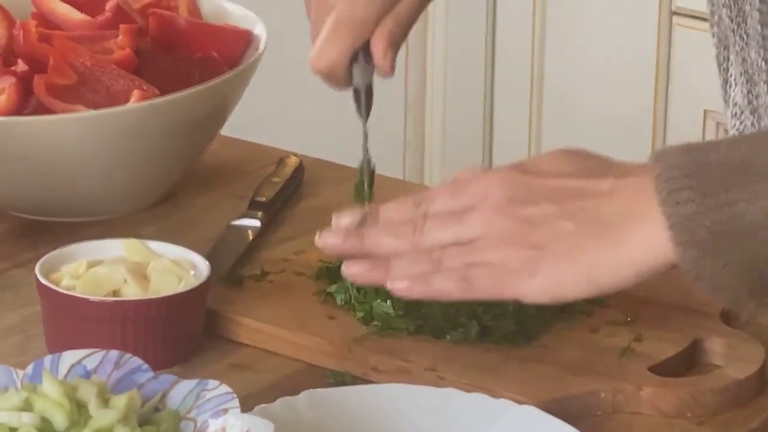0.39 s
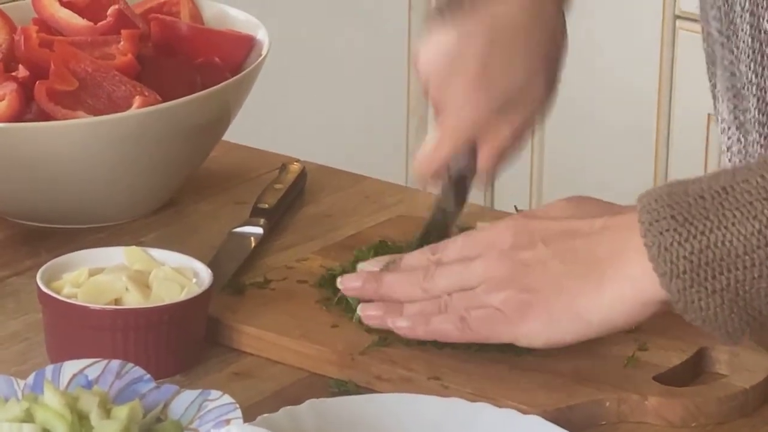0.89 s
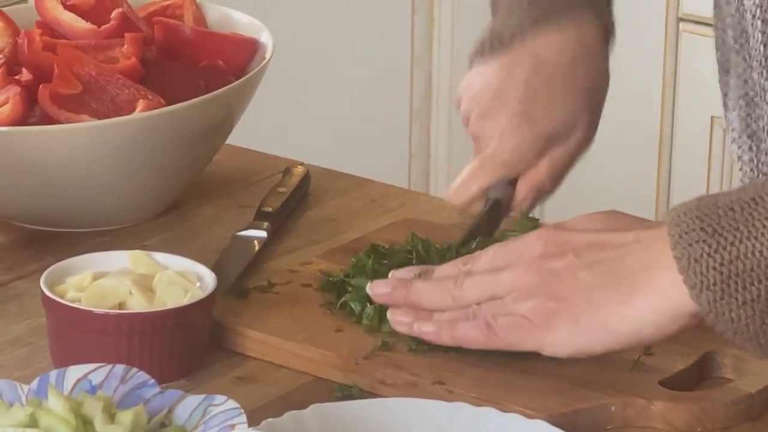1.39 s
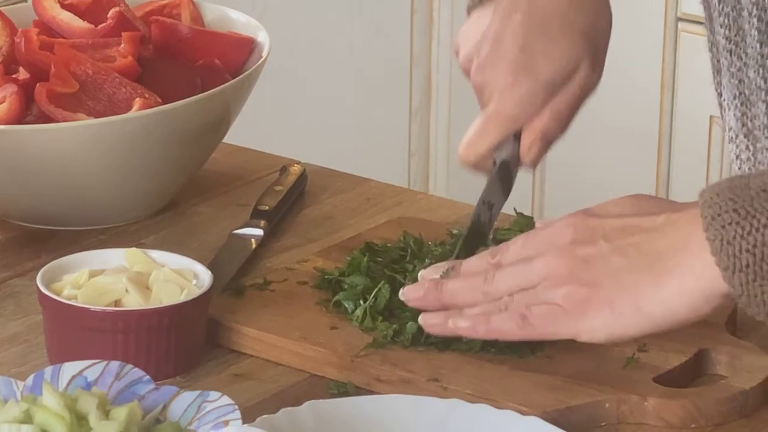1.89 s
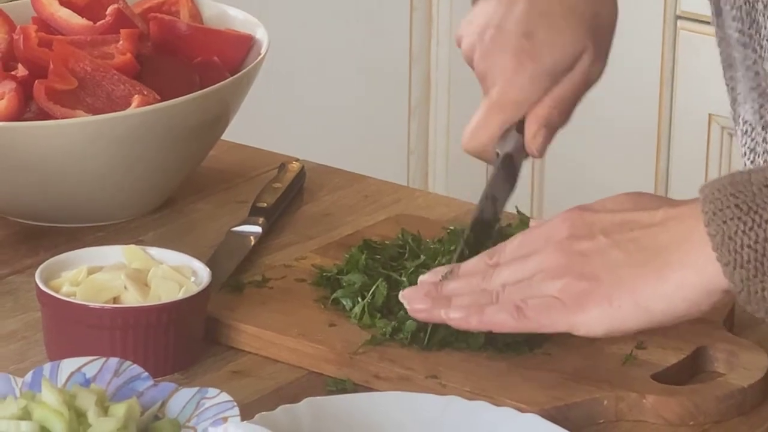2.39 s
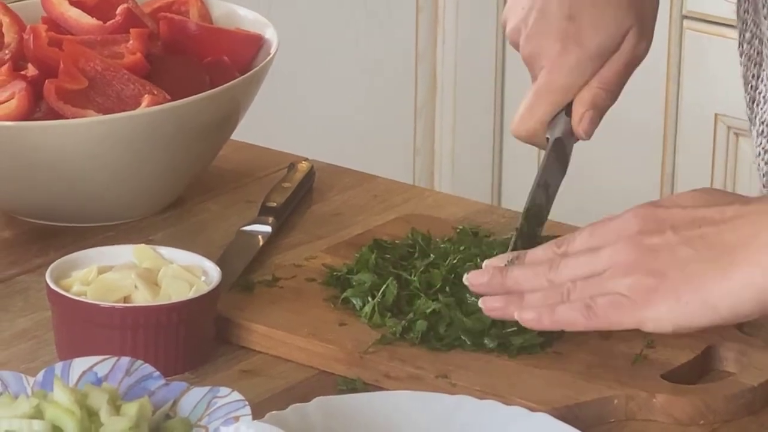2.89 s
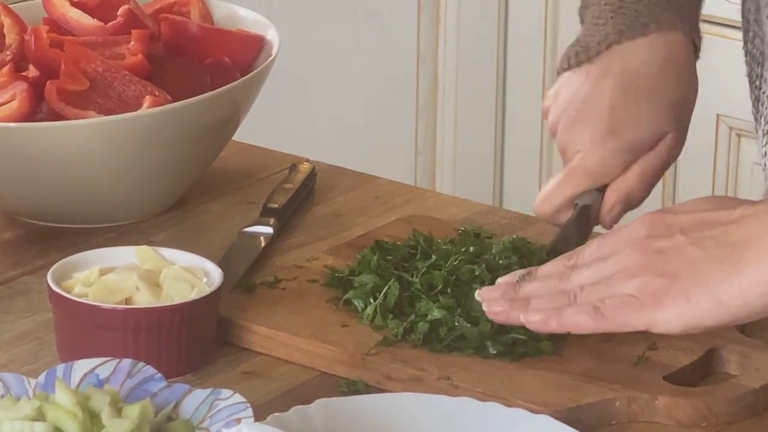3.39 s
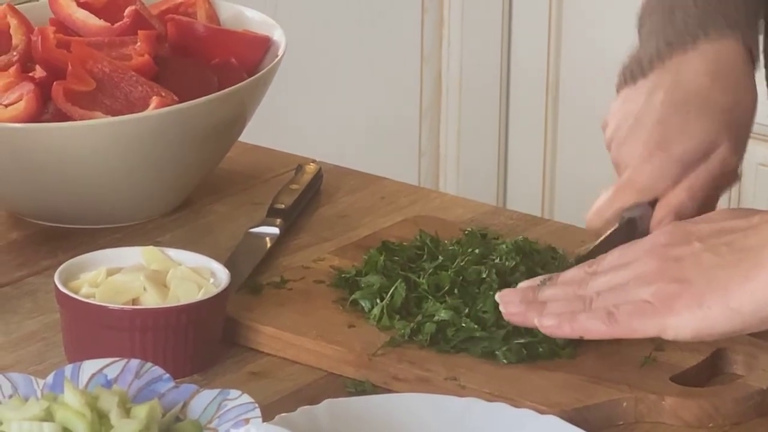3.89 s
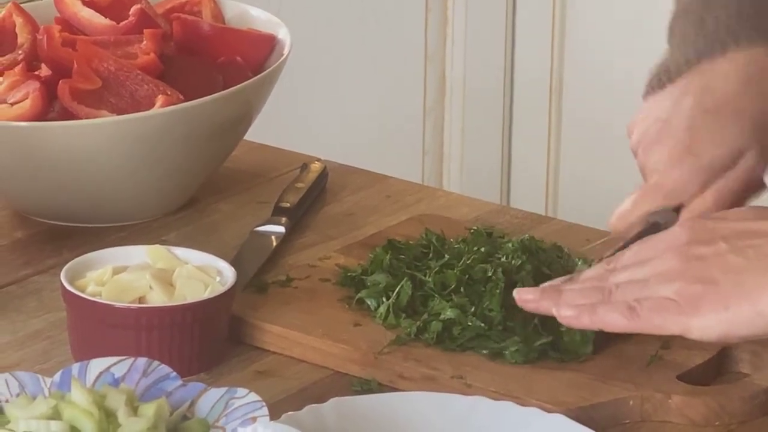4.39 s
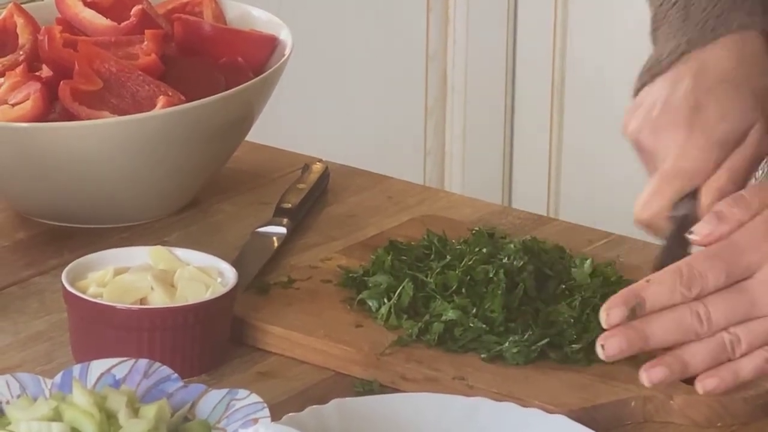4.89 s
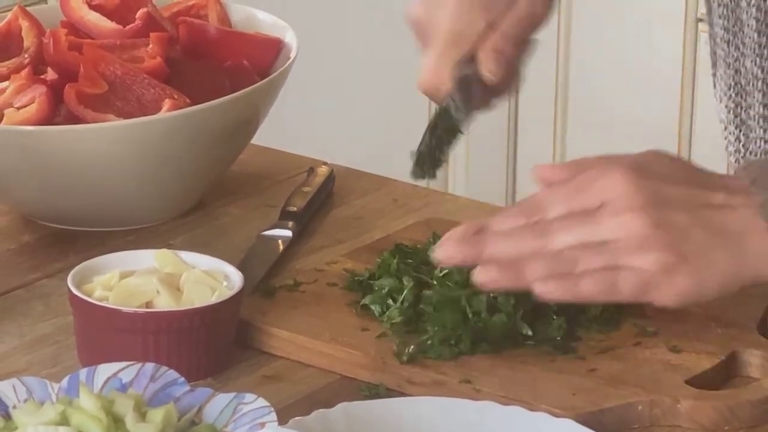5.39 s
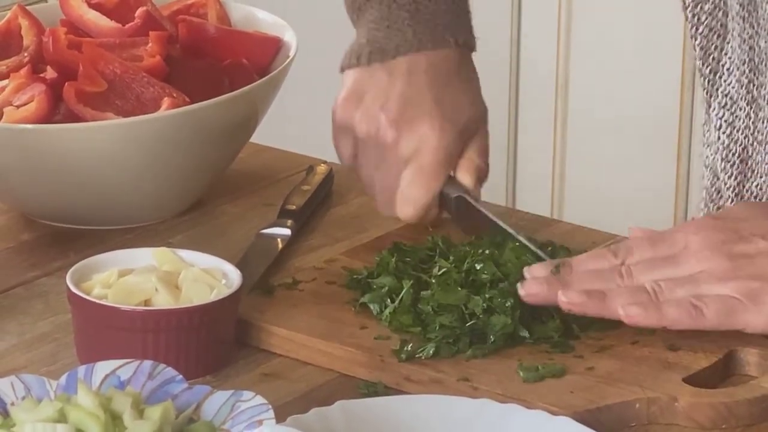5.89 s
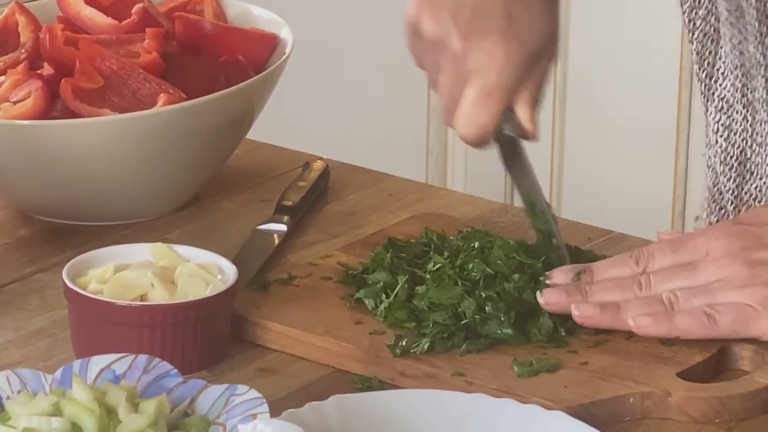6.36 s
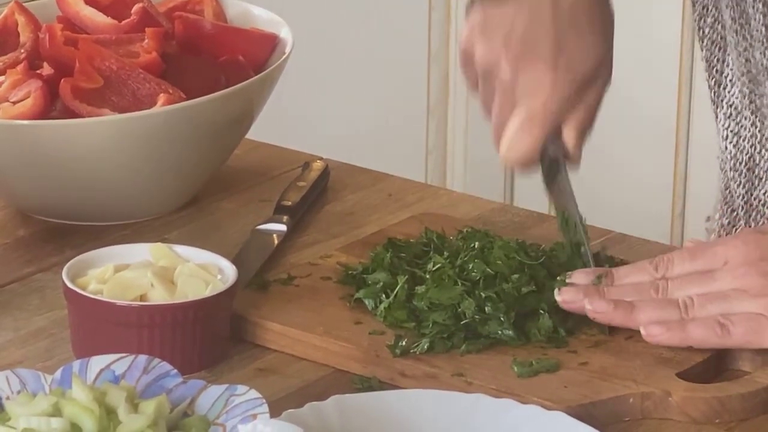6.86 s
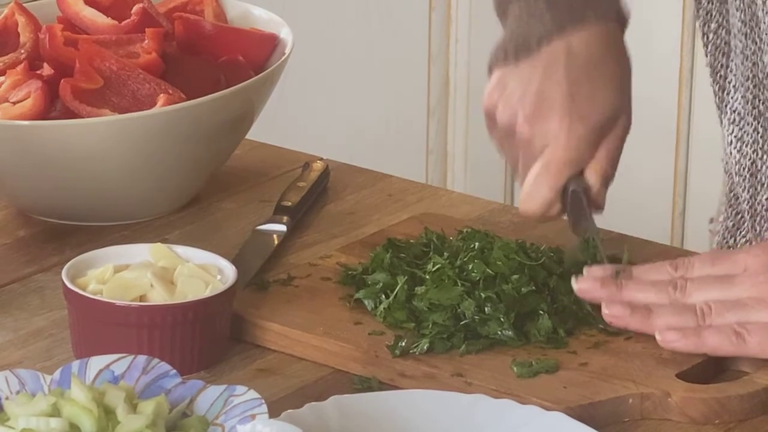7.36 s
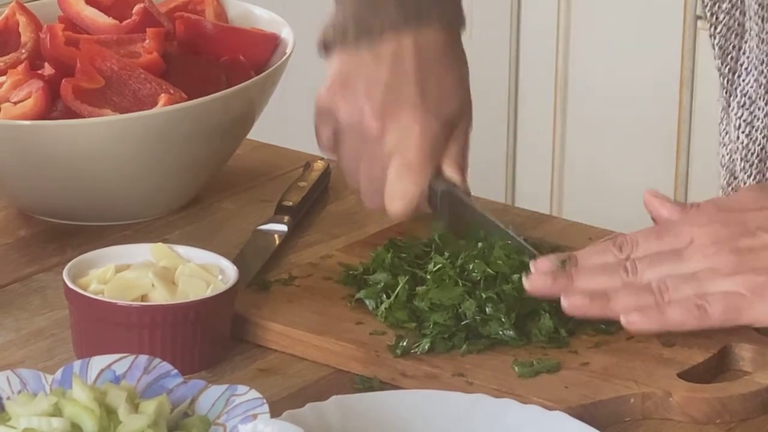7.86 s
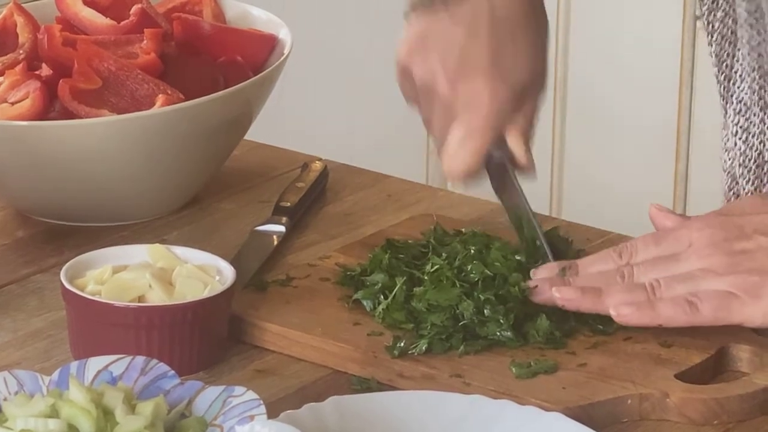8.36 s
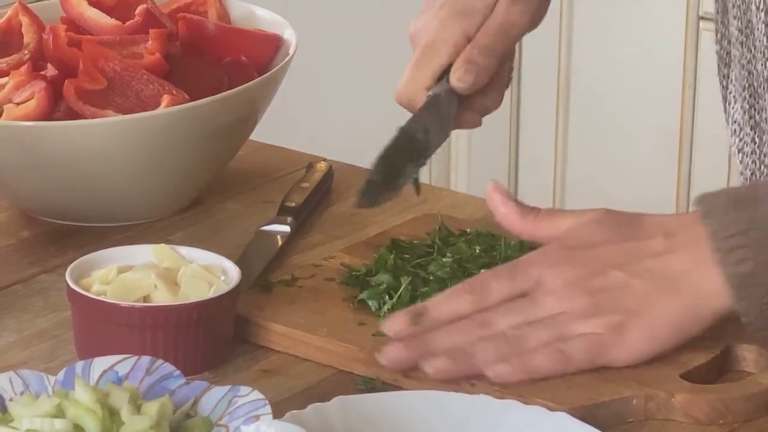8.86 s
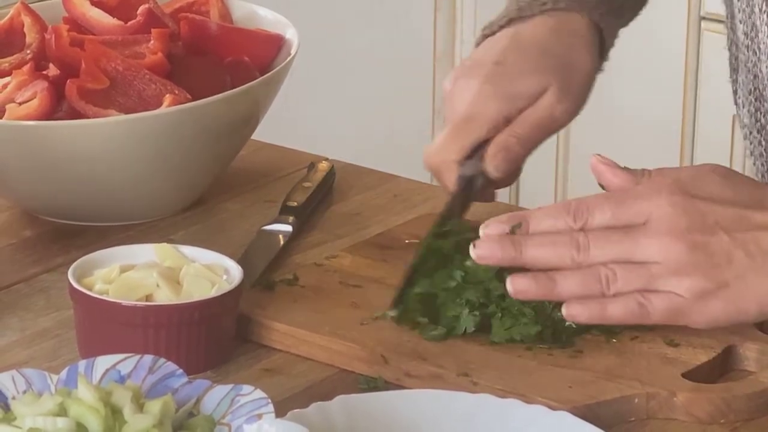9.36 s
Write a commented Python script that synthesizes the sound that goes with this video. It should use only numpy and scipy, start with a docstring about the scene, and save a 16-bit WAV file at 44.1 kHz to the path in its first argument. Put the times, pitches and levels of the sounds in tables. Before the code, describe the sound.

A knife chops a heap of fresh herbs on a wooden board, close up. Hollow woody knocks with crisp leafy crunches come in groups of about three or four a second, separated by short pauses. Now and then the blade drags and thumps across the board. A short echo of a hard-walled kitchen surrounds it, over a faint hush; treble is muffled.

```python
"""In a hard-walled kitchen, a knife rocks through a heap of herbs on a wooden board.
Random jolts under the edge crunch leaves and stems and ring the board, the table and the steel;
now and then the blade is dragged sideways to gather the heap, and sharp knocks and cracks stand out.
Coloured grains make leaves rustle; filtered noise makes a quiet hush, low hum and rumble.
A diffuse noise echo surrounds knife and leaves; a sharp cut above 7 kHz leaves only faint treble."""
import sys
import numpy as np
from scipy import signal
from scipy.fft import rfft, irfft, next_fast_len
from scipy.io import wavfile

SR = 44100
rng = np.random.default_rng(int(sys.argv[2]) if len(sys.argv) > 2 else 0)


def ratio_of_db(decibels):
    """Turn decibels (scalar or array-like) into linear amplitude factors; 0 dB maps to 1."""
    return 10 ** (np.asarray(decibels, float) / 20)


def dump_mix(stems):
    """Bounce the given channels to the path in sys.argv[1] as a 16-bit WAV at rate SR."""
    frames = np.atleast_2d(stems).T  # one column per channel
    limited = np.clip(frames, -1, 1)  # hard clip at full scale
    pcm = np.round(limited * 32767).astype(np.int16)
    wavfile.write(sys.argv[1], SR, pcm)


N = 418945

# chops through the heap, with relative drive levels and the board pitch where the blade lands:
# [start_s, board_db, crunch_db, pitch_hz, length_ms]
CHOP_STROKES = [(0.103, -16.5, -29.5, 1060, 27.6), (0.599, -11.5, -16, 1015, 42),
                (0.906, -11, -24, 1270, 48.5), (1.153, -7, -16, 1040, 42.7), (1.402, -9.5, -18, 940, 31.8),
                (1.919, -8, -19, 810, 78), (2.205, -7.5, -18, 727, 70), (2.464, -17.5, -27.5, 1060, 31.7),
                (3.066, -7, -17, 747, 49), (3.332, -10.5, -23, 860, 53.5), (3.601, -12.5, -18, 920, 42),
                (3.851, -15, -19, 1020, 40.5), (4.087, -7, -14.5, 1040, 27), (4.328, -5, -21.5, 1190, 11),
                (5.813, -9.5, -23.5, 1180, 54.6), (6.124, -46, -23.5, 895, 107), (6.384, -14, -25, 716, 40),
                (6.643, -9.5, -21.5, 1200, 37), (6.866, -12.5, -20.5, 1060, 40.4),
                (7.098, -20.5, -31, 1030, 52), (7.327, -17, -19.5, 681, 33), (7.838, -15.5, -26, 986, 46.4),
                (8.12, -9, -19, 960, 54.3), (8.336, -20, -26.5, 1090, 69)]
# blade dragged across the board, with relative drive levels:
# [start_s, board_db, rasp_db, thump_db, pitch_hz]
DRAG_STROKES = [(0.473, -4.5, -41, -22, 593), (4.335, -5.5, -43, -23.5, 625), (4.847, -4, -32, -30, 685),
                (6.081, -9.5, -43, -32.5, 630), (9.175, -4.5, -29.5, -18, 820)]
# sharp knocks and cracks: chop landings, blade set-downs, light touches between; relative levels:
# [start_s, board_db, crack_db]
SHARP_KNOCKS = [(0.104, -13.5, -24.5), (0.118, -10, -22), (0.473, -5.5, -36.5), (0.599, -2.5, -23),
                (0.631, -11, -25), (0.926, -9, -11), (1.152, -18, -32), (1.259, -10.5, -28),
                (1.376, -22, -28.5), (1.399, -8, -13.5), (1.41, -7, -15.5), (1.721, -43, -37),
                (1.813, -27.5, -42), (1.922, -15, -16.5), (1.971, -6, -12.5), (2.023, -8, -10),
                (2.189, -23.5, -35), (2.208, -5.5, -18), (2.226, -3.5, -10), (3.046, -20, -37.5),
                (3.077, -1.5, -23), (3.148, -10.5, -17), (3.362, -5, -9), (3.621, -17, -14),
                (3.852, -15.5, -34.5), (4.063, -23, -27), (4.090, -11, -29.5), (4.306, -23, -27.5),
                (4.333, -2.5, -14), (4.352, -2.5, -22), (4.847, -5, -32), (5.814, -9.5, -24),
                (5.845, -13, -19.5), (5.89, -8.5, -16), (6.003, -17, -32), (6.083, -1.5, -30),
                (6.149, -6.5, -13), (6.192, -32, -13), (6.388, -7.5, -16), (6.498, -20, -28.5),
                (6.647, -14.5, -47), (6.663, -20.5, -18.5), (6.744, -13.5, -21), (6.866, -11, -34),
                (6.896, -10, -10.5), (7.1, -10, -13), (7.19, -17, -32), (7.331, -16, -42.5),
                (7.839, -10.5, -28), (7.861, -6, -30), (8.098, -25, -37), (8.122, -6, -15),
                (8.196, -15, -16), (8.336, -11.5, -37), (9.176, 0, -33), (9.193, -2.5, -62),
                (9.263, -8, -18)]
# resonances of the wooden board: [pitch_hz, width_hz, relative level_db]
BOARD_MODES = [(346, 100, -8.5), (498, 93, -13), (489, 97, -7.5), (649.4, 170, -0.5), (679.8, 36.6, -0.5),
               (764, 102, -3), (837, 90, 1), (948, 153, 1), (1095, 72, -2), (1193, 49.5, -4),
               (1306, 71, -4.5), (1447, 83, -10), (1736, 99, -10), (1763, 79, -13.5), (2160, 91, -10.5),
               (2860, 88, -28.5), (2740, 77, -25.5)]


def rms_one(x):
    """Scale to rms 1."""
    return x / np.sqrt(np.mean(x ** 2) + 1e-20)


def at_hz(points, hz):
    """Read a table on a log-frequency axis."""
    points = np.array(points)
    return np.interp(np.log(np.maximum(hz, 1)), np.log(points[:, 0]), points[:, 1])


def colour(x, spectrum):
    """Give a signal a spectrum, with minimum phase so that nothing sounds early; white noise keeps its rms."""
    log_gain = at_hz(spectrum, np.arange(2049) * SR / 4096) * np.log(10) / 20
    cepstrum = irfft(log_gain)
    # folding the cepstrum onto positive time gives minimum phase
    cepstrum[1:2048] *= 2
    cepstrum[2049:] = 0
    pulse = irfft(np.exp(rfft(cepstrum)))
    return signal.oaconvolve(x, pulse / np.linalg.norm(pulse))[:N]


def resonate(x, hz, width_hz):
    """Two-pole resonance; white noise keeps its rms."""
    r = np.exp(-np.pi * width_hz / SR)
    top = np.sqrt(SR / (np.pi * width_hz / 2)) * (1 - r * r) / 2
    return signal.lfilter([top, 0, -top], [1, -2 * r * np.cos(2 * np.pi * hz / SR), r * r], x + 1e-18)


def lowpass(x, order, hz):
    """Butterworth filter that dulls a sound above hz."""
    return signal.sosfilt(signal.butter(order, hz, fs=SR, output="sos"), x)


def bandpass(x, order, low_hz, high_hz):
    """Butterworth filter that keeps one band."""
    return signal.sosfilt(signal.butter(order, [low_hz, high_hz], "band", fs=SR, output="sos"), x)


def drift(rate_hz):
    """Slow chance, spread 1: twice-smoothed noise with 200 knots a second."""
    knots = rng.standard_normal(int(N / SR * 200) + 400)
    r = np.exp(-2 * np.pi * rate_hz / 200)
    settled = signal.lfilter([1], [1, -2 * r, r * r], knots)[390:]
    slow = rms_one(settled)
    return np.interp(np.arange(N) / SR * 200, np.arange(len(slow)), slow)


def grains(per_s, spread_db):
    """Random clicks of very uneven size; rms 1."""
    sizes = ratio_of_db(spread_db * np.minimum(rng.exponential(1, N), 4))
    signed = sizes * rng.choice([-1, 1], N)
    return rms_one(signed * (rng.random(N) < per_s / SR))


def add(track, start_s, rise_ms, fade_ms, gains, lead_ms):
    """Add one stroke's pressure: soft first touch, then a swell from start_s that dies away."""
    start = round((start_s - .06) * SR)     # the first touch leads by up to 60 ms
    ms = np.arange(min(SR // 2, N - start)) * 1000 / SR - 60
    rise_ms, fade_ms = max(rise_ms, 1), max(fade_ms, 1)
    swell = (.5 + .5 * ms / rise_ms) ** 2
    fade = np.exp(-(np.maximum(ms - rise_ms, 0) / fade_ms) ** 1.09)
    touch = 0.32 * np.exp(ms / max(lead_ms, .1))
    shape = np.where(ms < 0, touch, np.where(ms < rise_ms, swell, fade))
    track[..., start:start + len(ms)] += np.multiply.outer(gains, shape)


def table_rumble():
    """Low noise that swells as every chop and drag shakes the table, which settles again."""
    rumble = bandpass(rng.standard_normal(N), 1, 24, 51)
    rumble = rms_one(lowpass(rumble, 2, 70))
    shaking = np.full(N, ratio_of_db(-66))     # at rest
    for strokes, shudder_db in ((CHOP_STROKES, -47), (DRAG_STROKES, -51)):
        for start_s, *rest in strokes:
            add(shaking, start_s, 45, 64, ratio_of_db(shudder_db), lead_ms=45)
    return rumble * shaking * ratio_of_db(5.8 * drift(1.3))


def hush():
    """Coloured noise for the room, narrow noise for a low wavering hum, and the table's rumble."""
    # room noise spectrum: [pitch_hz, relative level_db]
    hush_spectrum = [(47, -30.5), (80, -2), (151, -0.5), (291, -5), (378, 4), (814, -6), (1250, -8),
                     (3990, -17), (6500, -17.5), (7000, -26.5), (9100, -51), (15400, -120)]
    steady = rms_one(colour(rng.standard_normal(N), hush_spectrum)) * ratio_of_db(-61.5 + 0.4 * drift(3.3))
    hum = ratio_of_db(-75) * rms_one(resonate(rng.standard_normal(N), 146, width_hz=12))
    return steady + hum + table_rumble()


def rustle():
    """Fine leaf grains swell and fade in two colours: a dull rub and a bright wipe."""
    # rustles: a chop's tail at the start, blade pressing on leaves, a hand brushing leaves;
    # relative levels: [centre_s, spread_ms, rub_db, wipe_db]
    rustle_swells = [(0.001, 26, -41, -80), (0.11, 35, -40, -46), (1.787, 52, -52.5, -53),
                     (1.89, 40, -56, -57), (2.86, 22, -61.5, -74), (3.031, 13, -77, -56),
                     (5.40, 37, -63.5, -72), (5.785, 35, -70, -52.5), (7.81, 27, -75, -59.5),
                     (8.62, 69, -59.5, -81), (8.79, 81, -53, -55.5), (8.94, 40, -52.5, -46),
                     (9.12, 25, -66.5, -75), (9.51, 29, -26, -48)]
    # dull rub: [pitch_hz, relative level_db_per_hz]
    rub_spectrum = [(120, -27), (200, -4), (500, -1), (950, -1.5), (1300, -6.5), (2500, -13.5),
                    (3500, -22.5), (7000, -31), (16000, -41)]
    # bright wipe: [pitch_hz, relative level_db_per_hz]
    wipe_spectrum = [(1500, -27), (2500, -9.5), (3900, -8), (4700, -1), (5100, -4.5), (5600, -7),
                     (7000, -8.5), (16000, -1.5)]
    t = np.arange(N) / SR
    rub, wipe = ratio_of_db(-68.5), ratio_of_db(-75)     # between swells
    for centre_s, spread_ms, rub_db, wipe_db in rustle_swells:
        swell = np.exp(-np.abs((t - centre_s) * 1000 / spread_ms) ** 1.1)
        rub = rub + ratio_of_db(rub_db) * swell
        wipe = wipe + ratio_of_db(wipe_db) * swell
    rub = rub * ratio_of_db(0.68 * drift(17)) * grains(9000, spread_db=2.0)
    wipe = wipe * ratio_of_db(1.6 * drift(20)) * grains(12000, spread_db=4.0)
    return colour(rub, rub_spectrum) + colour(wipe, wipe_spectrum)


def pressure():
    """How hard each board mode, the leaves, the dragged edge and the table are driven over time."""
    rise_share = 0.41     # part of a chop's length spent biting in
    drag_rise_ms, drag_fade_ms = 33.3, 71
    on_board = np.zeros((len(BOARD_MODES), N))
    on_leaves, on_edge, on_table = np.zeros((3, N))
    pitches = np.array(BOARD_MODES)[:, 0]
    # no two landings find the modes alike
    mixes = rng.standard_normal((len(CHOP_STROKES), len(BOARD_MODES)))
    for (start_s, board_db, crunch_db, pitch_hz, length_ms), mix in zip(CHOP_STROKES, mixes):
        rise_ms, fade_ms = rise_share * length_ms, (1 - rise_share) * length_ms
        near_db = -6.0 * np.log2(pitches / pitch_hz) ** 2     # modes near the landing pitch speak most
        add(on_board, start_s, rise_ms, fade_ms, ratio_of_db(board_db + near_db + 1.14 * mix), lead_ms=9.8)
        add(on_leaves, start_s, rise_ms, 0.76 * fade_ms, ratio_of_db(crunch_db), lead_ms=7.1)
        add(on_table, start_s, rise_ms, fade_ms, ratio_of_db(board_db - 25.5), lead_ms=22)
    for start_s, board_db, rasp_db, thump_db, pitch_hz in DRAG_STROKES:
        near_db = -5.0 * np.log2(pitches / pitch_hz) ** 2
        add(on_board, start_s, drag_rise_ms, drag_fade_ms, ratio_of_db(board_db + near_db), lead_ms=.5)
        add(on_edge, start_s, 2.1 * drag_rise_ms, drag_fade_ms, ratio_of_db(rasp_db), lead_ms=.5)
        add(on_table, start_s, drag_rise_ms, drag_fade_ms, ratio_of_db(thump_db), lead_ms=0.67)
    return on_board, on_leaves, on_edge, on_table


def knock_times():
    """Sample index, board level and crack level of each sharp knock or crack."""
    start_s, board_db, crack_db = np.transpose(SHARP_KNOCKS)
    return np.round(start_s * SR).astype(int), board_db, crack_db


def board_ring(jolts, on_board):
    """Jolts and knocks ring the modes of the wooden board."""
    at, board_db, _ = knock_times()
    scatter = rng.standard_normal((len(at), len(BOARD_MODES)))
    ring = np.zeros(N)
    for k, (hz, width_hz, db) in enumerate(BOARD_MODES):
        drive = ratio_of_db(-14.5) * jolts * on_board[k]
        drive[at] += ratio_of_db(board_db) * (0.77 + scatter[:, k])     # each knock finds another mix of modes
        ring += (-1) ** k * ratio_of_db(db) * resonate(drive, hz, width_hz)
    return lowpass(ring, 4, 3300)     # wood under leaves is a soft contact


def table_thump(jolts, on_table):
    """The same jolts and knocks pass through the board and ring the table below."""
    # resonances of the table: [pitch_hz, width_hz, relative level_db]
    table_modes = [(120.4, 20, -6.5), (163, 18, 2), (227.5, 16, 2), (286, 19, 2.5), (378, 30, -1.5)]
    at, board_db, _ = knock_times()
    thumps = jolts * on_table
    thumps[at] += ratio_of_db(-11.5 + 0.94 * board_db)     # harder knocks thump harder
    ring = np.zeros(N)
    for k, (hz, width_hz, db) in enumerate(table_modes):
        ring += (-1) ** k * ratio_of_db(db - 13) * resonate(thumps, hz, width_hz)
    return lowpass(ring, 2, 900)     # the board cushions the table


def patchy(x, patchy_db):
    """Each 0.6-octave band flickers on its own: leaves and stems of many sizes give way."""
    edges = 900 * 2 ** np.arange(0, 4.4, .6)
    flickering = np.zeros(N)
    for low, high in zip(edges, edges[1:]):
        flickering += ratio_of_db(patchy_db * drift(45)) * bandpass(x, 2, low, high)
    return flickering


def cut_leaves(snaps, on_leaves):
    """Stems snap in a dense rattle, and sharp cracks splinter as brief noise bursts."""
    at, _, crack_db = knock_times()
    crack = np.zeros(N)
    crack[at] = ratio_of_db(crack_db)
    burst = np.exp(-np.arange(700) / 150)     # a few milliseconds of splintering
    crack = signal.oaconvolve(crack, burst)[:N] * rng.standard_normal(N)
    return patchy(ratio_of_db(-4) * snaps * on_leaves + crack, patchy_db=1.5)


def blade_ring(cutting, rasp):
    """Cutting, dragging and flicks of its flat side ring the steel."""
    # resonances of the steel: [pitch_hz, width_hz, relative level_db]
    blade_modes = [(3020, 1300, -16.5), (4040, 25, -25.5), (4545, 420, -15), (5340, 22, -46),
                   (6440, 520, -23)]
    # flicks of the flat of the blade: [start_s, relative level_db]
    flicks = [(4.306, -10), (5.028, -19), (6.152, -8), (6.166, -22), (9.26, 11), (9.302, -8.5)]
    struck = cutting + ratio_of_db(-19) * rasp
    flicked = np.zeros(N)
    for start_s, db in flicks:
        flicked[round(start_s * SR)] = ratio_of_db(db)
    ring = np.zeros(N)
    for hz, width_hz, db in blade_modes:
        drive = struck + flicked * (width_hz < 100)     # a flick wakes only the free, narrow modes
        # each mode's level wanders slowly by chance
        ring += ratio_of_db(db + 2 * drift(2.2)) * resonate(drive, hz, width_hz)
    return ring


def knife():
    """Shared jolts under the edge crunch leaves, rasp on wood and ring the board, table and blade."""
    # crunch of leaves and stems: [pitch_hz, relative level_db_per_hz]
    crunch_spectrum = [(900, -27), (1500, -8.5), (1940, 1), (2140, -2), (2800, -4), (3450, -1.5),
                       (3950, -11.5), (4670, -5.5), (6200, -14), (7000, -7.5), (16000, -13.5)]
    # blade dragged on wood: [pitch_hz, relative level_db_per_hz]
    rasp_spectrum = [(900, -25.5), (1400, 7.5), (2000, 2), (2600, 0), (3200, -10), (3600, -25),
                     (5000, -18.5), (7000, -26), (16000, -7)]
    on_board, on_leaves, on_edge, on_table = pressure()
    jolts = grains(1500, spread_db=4.0) * ratio_of_db(2 * drift(87))
    snaps = 1.014 * jolts + 1.1 * grains(5000, spread_db=8.0)
    cutting = cut_leaves(snaps, on_leaves)
    rasp = snaps * on_edge
    wood = board_ring(jolts, on_board) + table_thump(jolts, on_table)
    contact = colour(cutting, crunch_spectrum) + colour(rasp, rasp_spectrum)
    return wood + blade_ring(cutting, rasp) + contact


def kitchen(x):
    """Diffuse echo: noise that dies band by band, building up over the first milliseconds."""
    # time for the echo to fall 60 dB: [pitch_hz, decay_s]
    echo_decay = [(100, 0.18), (260, 0.46), (700, 0.43), (1840, 0.51), (4850, 0.27)]
    t = np.arange(int(.8 * SR)) / SR
    edges = 60 * 2 ** np.arange(0, 8.1, 1)     # octave bands
    echo = np.zeros(len(t))
    for low, high in zip(edges, edges[1:]):
        band = bandpass(rng.standard_normal(len(t)), 2, low, high)
        decay_s = at_hz(echo_decay, np.sqrt(low * high))
        echo += band * ratio_of_db(-60 * (t / decay_s) ** 1.007)
    echo *= 1 - np.exp(-t / 0.017)
    return signal.oaconvolve(x, echo / np.linalg.norm(echo))[:N]


def scene():
    """Knife and leaves close by, their echo, the hush."""
    near = knife() + rustle()
    return (near + ratio_of_db(-9) * kitchen(near) + hush())[None]


def top_cut(x):
    """Nothing passes above the cut-off."""
    return signal.sosfilt(signal.butter(12, 15740, fs=SR, output="sos"), x)


def record(dry):
    """The sound is cut sharply above 7 kHz, leaving only faint treble; the highest peaks are rounded."""
    # treble cutoff with a faint shelf above it: [pitch_hz, gain_db]
    treble_cutoff = [(7000, 0.5), (7500, -41), (10800, -26), (11300, -41.5), (15000, -38.5), (15800, -71)]
    size = next_fast_len(N + 4096)
    gain = ratio_of_db(at_hz(treble_cutoff, np.arange(size // 2 + 1) * SR / size))
    heard = irfft(rfft(dry, size) * gain, size)[:, :N]
    heard = 0.99 * np.tanh(heard / 1.168)     # soft limit
    return top_cut(heard)


dry = scene()
out = record(dry)
dump_mix(out)
```